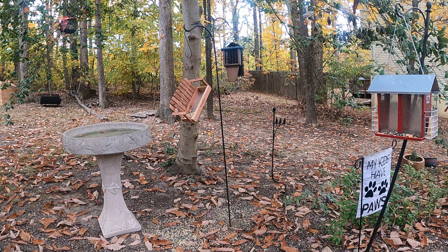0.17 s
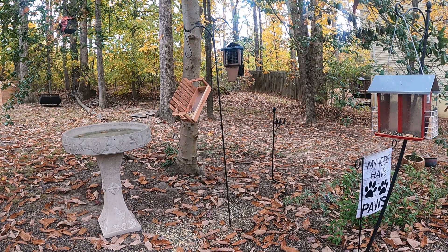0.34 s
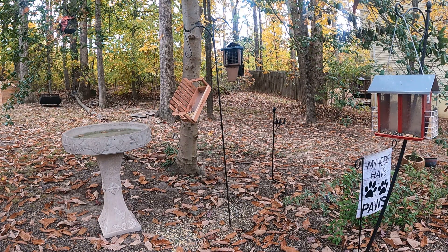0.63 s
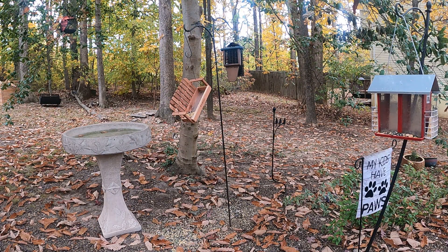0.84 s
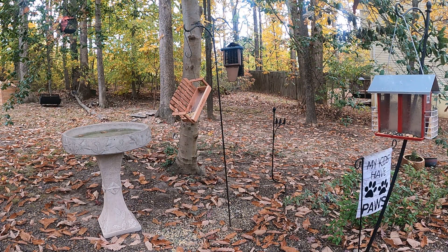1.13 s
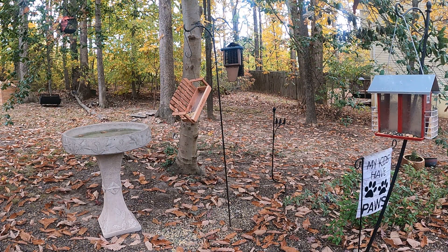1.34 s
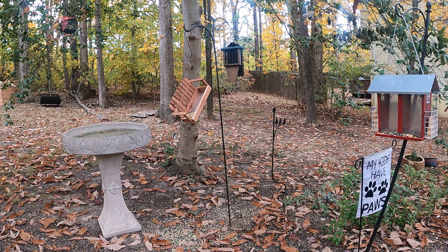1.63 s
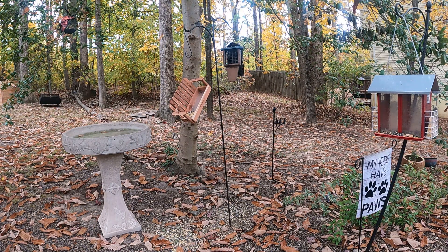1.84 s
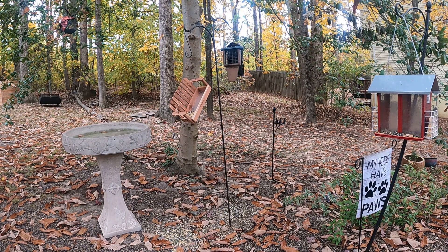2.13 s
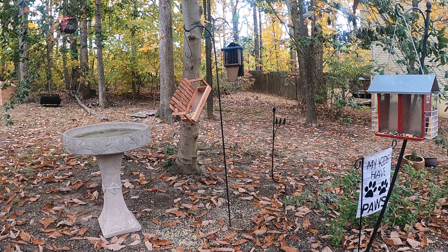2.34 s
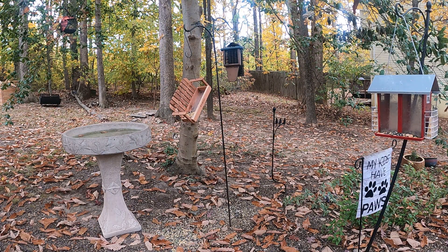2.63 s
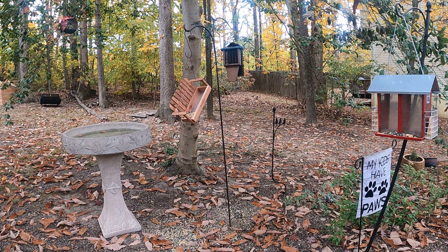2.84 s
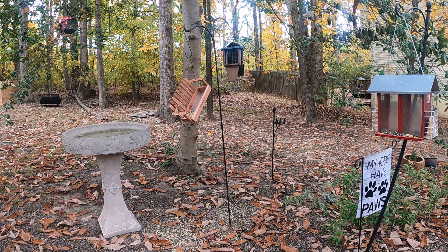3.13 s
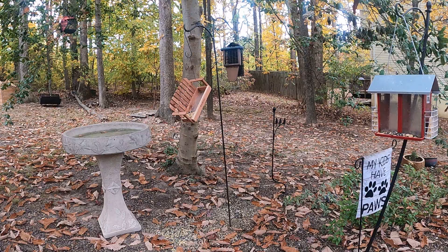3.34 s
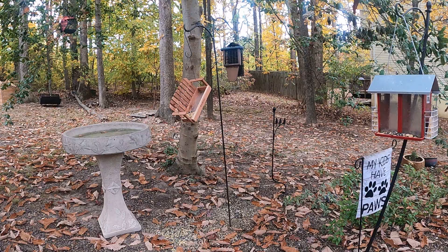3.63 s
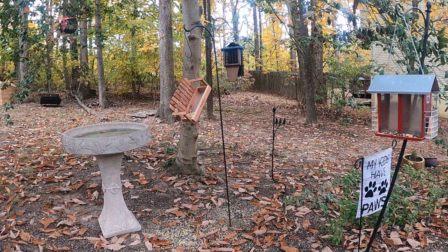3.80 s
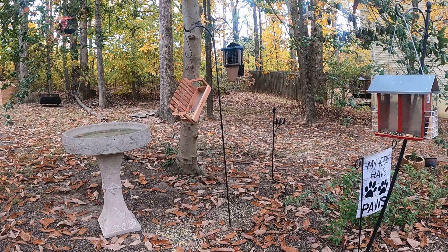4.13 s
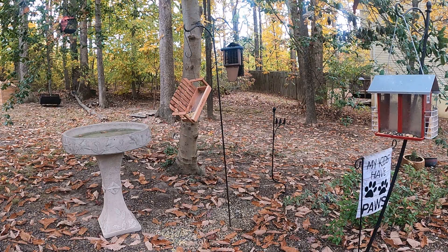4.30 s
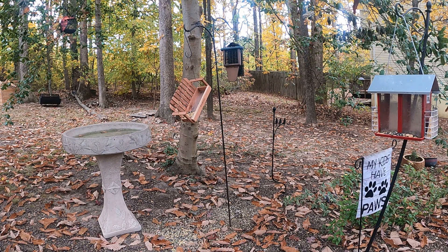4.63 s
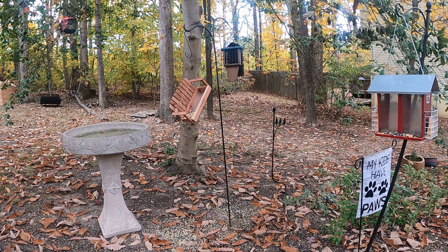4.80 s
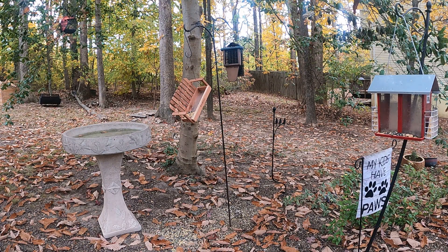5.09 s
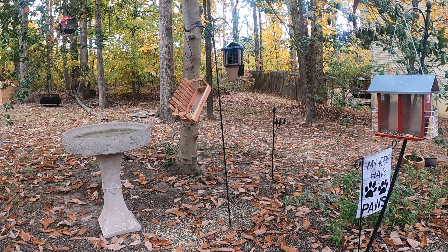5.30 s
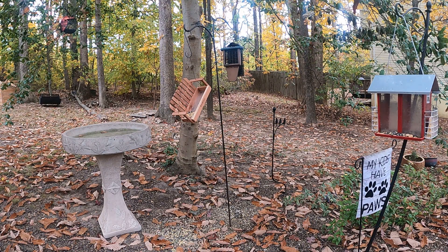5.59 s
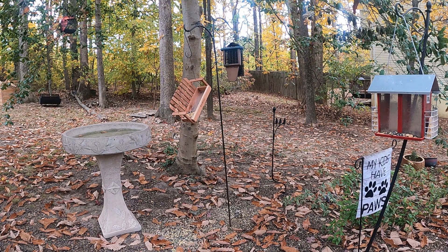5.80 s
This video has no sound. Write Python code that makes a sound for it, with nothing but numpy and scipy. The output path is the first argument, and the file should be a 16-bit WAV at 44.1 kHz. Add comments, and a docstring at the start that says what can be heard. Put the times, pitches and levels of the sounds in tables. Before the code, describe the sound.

A quiet wooded backyard in autumn, about six seconds, heard by a fixed stereo microphone. Distant traffic forms a constant deep, gently heaving rumble with soft tyre wash around it; a low roar is fuller at the start, and the traffic lifts slightly near 3.5 s. Dry leaves rustle very faintly now and then, most noticeably near 1.7 and 3.1 s. A songbird some way off gives a soft phrase at 0.6 s, then clearer ones from 1.5 s, coming quickly between 2.1 and 3.5 s: a buzzy upward flick, a fall, then lower steps. It is loudest around 3.3 s. Two softer calls follow at 4.4 and 4.8 s. Thin, fast, high trills sound far away around 3.9-4.6 s and again from 5.2 s to the end, with faint low notes near 4.5 and 5 s. A nearer small bird gives tiny sharp rising chips at 2.4, 3.9 and 5.2 s. Trees blur the calls into soft tails.

```python
"""Distant traffic rumbles, with tyre wash and a low roar, behind a wooded backyard in autumn where dry leaves rustle.
A songbird some way off repeats a phrase that rises, then steps down; others trill thinly far away, and a small
bird close by gives sharp rising chips. Traffic and leaves are filtered noise shaped by swells; the birds are
quivering near-sines, and trunks scatter every call into a soft tail."""
import sys
import numpy as np
from scipy import signal
from scipy.fft import rfft, irfft, next_fast_len
from scipy.io import wavfile
from scipy.ndimage import uniform_filter1d, map_coordinates

SR = 44100
rng = np.random.default_rng(int(sys.argv[2]) if len(sys.argv) > 2 else 0)


def master_out(mix):
    """Clip the mix to full scale and print it as 16-bit PCM to the path in sys.argv[1]."""
    frames = np.transpose(np.atleast_2d(mix))
    ceiling = np.clip(frames, -1, 1)
    pcm = np.round(ceiling * 32767).astype(np.int16)
    wavfile.write(sys.argv[1], SR, pcm)


N = 262395
TIME = np.arange(N) / SR


def undb(db):
    """Decibels to gain."""
    return 10 ** (np.asarray(db) / 20)


def unit(x):
    """Scale to rms 1."""
    return x / np.sqrt(np.mean(x ** 2))


def colour(x, points):
    """Filter by (f/Hz, gain/dB) points joined on a log-frequency axis."""
    hz, db = np.transpose(points)
    size = next_fast_len(x.shape[-1])
    bins = np.maximum(np.fft.rfftfreq(size, 1 / SR), 1)
    gain = undb(np.interp(np.log(bins), np.log(hz), db))
    return irfft(rfft(x, size) * gain, size)[..., :x.shape[-1]]


def walk(rate):
    """Random wander: straight lines between normal random knots, rate knots per second."""
    knots = rng.standard_normal(int(N / SR * rate) + 4)
    return map_coordinates(knots, [TIME * rate], order=1)


def swells(rows):
    """Gain over time of sounds that each grow and fade in a bell shape."""
    return sum(undb(db) * np.exp(-.5 * ((TIME - s) / half) ** 2) for s, half, db in rows)


def around(pair):
    """Two unrelated signals as sound from all sides: alike in the bass, wider above."""
    # stereo width of the surrounding air: f/Hz, side gain/dB
    width = [(30, -25), (90, -25.5), (180, -16), (350, -12.5), (700, -10), (1400, -7.5), (2600, -3.5),
             (5000, -7.5), (9000, -5.5)]
    side = colour(pair[1], width)
    return np.array([pair[0] + side, pair[0] - side])


def pan(left_db):
    """Gains of the two channels, the left louder than the right by left_db."""
    return undb(np.array([[left_db], [-left_db]]) / 2)


def add(track, start, sound):
    """Mix a sound in at its time."""
    i = int(start * SR)
    track[i:i + len(sound)] += sound[:max(N - i, 0)]


def rumble():
    """Far engines: a deep rumble that heaves, a drone that swells on its own, and a steadier body above both."""
    # tone of the engines before each band is levelled: f/Hz, gain/dB
    engine_tone = [(10, -12), (18, -8), (28, -0.5), (39, -0.5), (52, 4), (72, 3), (100, -0.5), (125, -1),
                   (160, -12), (220, -19.5), (400, -85)]
    # surges of the deep rumble: t/s at the height, half length/s, level/dB before panning
    heaves = [(1.21, 0.079, -42), (1.662, 0.023, -41), (2.57, 0.14, -46.5), (3.7, 0.034, -34.5)]
    # swells of the engine drone: t/s at the height, half length/s, level/dB before panning
    drone_swells = [(0.26, 0.062, -51), (1.162, 0.11, -47), (3.422, 0.064, -49), (3.774, 0.12, -45),
                    (4.44, 0.082, -49.5), (4.993, 0.079, -44.5), (5.425, 0.16, -45)]
    # swells of the upper body: t/s at the height, half length/s, level/dB before panning
    body_swells = [(3.719, 0.12, -57), (5.603, 0.22, -62.5)]
    split_hz, body_hz = 65, 122
    # filter kind, edges, steady level in dB, surges
    layers = (("lowpass", split_hz, -44, heaves),
              ("bandpass", (split_hz, body_hz), -46, drone_swells),
              ("highpass", body_hz, -51.5, body_swells))
    out = 0
    for kind, edges, steady_db, surges in layers:
        sos = signal.butter(4, edges, kind, fs=SR, output="sos")
        band = signal.sosfiltfilt(sos, rng.standard_normal((2, N)), padtype="even")
        band = around(colour(band, engine_tone))
        # even out the noise's own ups and downs, so that the surges shape the level
        power = uniform_filter1d(np.mean(band ** 2, axis=0), size=SR // 6)
        band = band / np.sqrt(power)
        out = out + band * (undb(steady_db) + swells(surges))
    return pan(left_db=0.3) * out


def tyre_wash():
    """A distant road: a broad hump of tyre noise near 1 kHz, and a lower roar that comes and goes."""
    # tone of the tyre wash: f/Hz, relative level/dB per Hz
    wash_tone = [(120, 0.5), (200, -4.5), (320, -8), (500, -3), (750, -0.5), (1000, 1), (1500, -4.5),
                 (2100, -10.5), (3000, -19), (4500, -24.5), (7300, -29.5), (8500, -42.5), (11500, -55),
                 (13000, -66)]
    # tone of the road roar: f/Hz, relative level/dB per Hz
    roar_tone = [(115, -24), (170, 2), (215, 0.5), (290, 0.5), (370, -3.5), (520, -19.5)]
    # the wash rises a little as a car passes: t/s at the height, half length/s, level/dB before panning
    wash_swells = [(3.45, 0.61, -68)]
    # cars passing on the far road: t/s at the height, half length/s, roar level/dB
    passes = [(0, 0.66, -60), (3.3, 0.22, -68)]
    wash_db, roar_db, flicker_db = -47, -61.5, 0.63
    wash = unit(around(colour(rng.standard_normal((2, N)), wash_tone)))
    roar = unit(around(colour(rng.standard_normal((2, N)), roar_tone + [(1500, -69)])))
    wash = wash * (undb(wash_db + flicker_db * walk(9)) + swells(wash_swells))
    roar = roar * (undb(roar_db) + swells(passes))
    return pan(left_db=1.3) * wash + roar


def leaves():
    """Each stir of the leaf litter is a cloud of tiny dry ticks of uneven size."""
    # rustles of dry leaves: t/s at the height, half length/s, level/dB before panning
    rustles = [(0.293, 0.051, -69), (0.504, 0.1, -72), (1.02, 0.2, -71.5), (1.21, .06, -80),
               (1.693, 0.083, -65.5), (1.92, 0.064, -74), (2.18, 0.11, -74), (2.60, 0.058, -73),
               (3.09, 0.063, -67), (4.31, 0.044, -72), (5.68, 0.079, -74)]
    # tone of the ticks: f/Hz, relative level/dB per Hz
    leaf_tone = [(1500, -11), (3000, -5.5), (5000, 6), (7400, 0), (8500, -4.5), (10500, -11),
                 (12300, -15.5), (13500, -36)]
    ticks_per_s = 12000
    ticks = rng.standard_normal((2, N)) * (rng.random(N) < ticks_per_s / SR)
    return pan(left_db=3.0) * swells(rustles) * unit(around(colour(ticks, leaf_tone)))


def slur(length, start_hz, middle_hz, end_hz, edge):
    """Pitch arc and breath pressure of one note; edge is the share spent swelling and fading."""
    u = np.linspace(0, 1, int(length * SR))
    arc = np.polyfit([0, .5, 1], [start_hz, middle_hz, end_hz], 2)
    return u * length, np.polyval(arc, u), signal.windows.tukey(len(u), edge)


def whistles(notes, quiver_hz, blur, edge, flutter_db, rise_tilt_db):
    """The syrinx sings a near-sine along each arc; pitch and loudness quiver quickly and unevenly."""
    onset_share = 0.25  # share of a falling note spent swelling
    out = np.zeros(N)
    quiver_phase = 2 * np.pi * np.cumsum(quiver_hz * (1 + 0.36 * walk(220))) / SR
    wobble = signal.sawtooth(quiver_phase, .5) + blur * walk(700)  # triangle wave plus jitter
    wobble = np.tanh(1.32 * wobble)  # the pitch swings only so far, which keeps the top of a note crisp
    flutter = undb(flutter_db * walk(260))
    for start, length, start_hz, middle_hz, end_hz, db, depth_hz in notes:
        t, hz, push = slur(length, start_hz, middle_hz, end_hz, edge)
        # each note buzzes most in its middle
        buzz = np.sqrt(np.abs(np.sin(np.pi * t / length)))
        hz = hz + depth_hz * buzz * wobble[int(start * SR):][:len(t)]
        # falling notes swell slowly; the loudness of a rising note tilts from its start to its end
        falling = end_hz < start_hz
        if falling:
            push = push * np.minimum(t / (onset_share * length), 1)
        tilt_db = 0 if falling else rise_tilt_db
        size = undb(db + tilt_db * (t / length - .5)) * np.sqrt(2)
        add(out, start, size * push * np.sin(2 * np.pi * np.cumsum(hz) / SR))
    return out * flutter


def woods(x, direct_db, early_db, late_db, early_t60, late_t60):
    """The straight path, quick scatter from near trunks, then a dense tail; t60 is the time in s to fall 60 dB."""
    t = np.arange(SR) / SR
    trunks = unit(undb(-60 * t / early_t60) * (1 - np.exp(-t / 0.0059)))
    deep = unit(undb(-60 * t / late_t60) * (1 - np.exp(-t / 0.026)))
    fade = np.hypot(undb(early_db) * trunks, undb(late_db) * deep) / np.sqrt(SR)
    out = undb(direct_db) * np.array([x, x])
    # the scatter changes as birds and branches move: overlapping pieces each get a fresh echo
    hold = int(0.3 * SR)
    for i in range(0, N, hold):
        piece = x[i:i + 2 * hold]
        piece = piece * np.sin(np.pi * np.arange(len(piece)) / (2 * hold))
        echo = fade * unit(around(rng.standard_normal((2, SR))))
        for channel, heard in zip(out, signal.fftconvolve(piece[None], echo, axes=1)):
            add(channel, i / SR, heard)
    return out


def songbird():
    """Up in the trees, so the echoes are stronger than the straight path."""
    # the notes: a lead-in, a buzzy rise, a fall and low steps, phrase by phrase; then two softer closing calls
    # t/s, length/s, start f/Hz, middle f/Hz, end f/Hz, level/dB before the woods, quiver depth/Hz
    song_notes = [(.558, 0.046, 4590, 4660, 4740, -62.5, 130), (.58, .05, 5170, 5540, 5600, -61, 240),
                  (.616, 0.067, 3990, 3820, 3470, -53, 240), (.745, 0.061, 2803, 2900, 2870, -53.5, 190),
                  (1.516, 0.078, 4550, 4910, 5460, -50.5, 340), (1.586, 0.068, 3890, 3590, 3360, -48, 240),
                  (1.706, 0.067, 2900, 2836, 2740, -51, 160), (2.143, 0.07, 4620, 4950, 5340, -50, 300),
                  (2.214, 0.066, 3830, 3743, 3650, -48.5, 150), (2.33, 0.064, 2990, 2890, 2790, -49.5, 170),
                  (2.42, 0.049, 2760, 2610, 2570, -50, 155), (2.518, 0.062, 4320, 4660, 4820, -50.5, 260),
                  (2.54, 0.051, 4690, 5200, 5590, -44.3, 350), (2.592, 0.06, 4130, 3980, 3900, -49, 140),
                  (2.616, 0.05, 3560, 3465, 3270, -49.5, 200), (2.705, 0.09, 2950, 2870, 2810, -52.3, 161),
                  (2.803, 0.063, 2710, 2596, 2530, -55, 170), (2.892, 0.048, 4550, 4670, 4760, -47.5, 160),
                  (2.916, 0.054, 4640, 5210, 5610, -45.5, 340), (2.976, 0.069, 4020, 3720, 3490, -46, 370),
                  (3.1, 0.055, 2990, 2914, 2840, -48.5, 160), (3.19, 0.052, 2676, 2540, 2480, -55.5, 165),
                  (3.264, 0.046, 4520, 4624, 4730, -43, 161), (3.287, .053, 4660, 5400, 5830, -45, 290),
                  (3.346, 0.066, 4220, 3900, 3670, -43, 360), (3.452, 0.06, 3060, 3006, 2950, -51, 140),
                  (4.36, .044, 4380, 4140, 3900, -59, 280), (4.38, 0.076, 3500, 3310, 3190, -54.5, 260),
                  (4.601, 0.051, 2530, 2784, 2910, -50, 220), (4.815, 0.047, 4580, 4920, 5200, -57, 380),
                  (4.814, 0.064, 3950, 3890, 3860, -55.5, 175),
                  (4.836, 0.045, 3780, 3560, 3400, -56.5, 240), (4.842, 0.096, 3340, 3317, 3280, -54, 140),
                  (5.06, 0.06, 2590, 2820, 2900, -51, 240)]
    song = whistles(song_notes, quiver_hz=135.1, blur=0.5, edge=0.24, flutter_db=2.5, rise_tilt_db=-1.0)
    heard = woods(song, direct_db=-11.0, early_db=-4.5, late_db=-5.0, early_t60=0.3, late_t60=0.99)
    return pan(left_db=0.2) * heard


def far_birds():
    """Thin calls that swell softly as their pitch sweeps fast and unevenly up and down, blurred by the wood."""
    # t/s, length/s, start f/Hz, middle f/Hz, end f/Hz, level/dB before pulsing and woods, sweep scale/Hz
    trills = [(0.677, 0.07, 2270, 2240, 2250, -58, 60), (1.67, 0.081, 7400, 7480, 7500, -71, 80),
              (3.88, 0.76, 5970, 6105, 6290, -65, 875), (4.472, 0.13, 2004, 2066, 2120, -58.5, 90),
              (4.931, 0.13, 1994, 2050, 2070, -58.5, 90), (4.98, 0.36, 5060, 5220, 5270, -71.5, 249),
              (5.29, 0.11, 6040, 6000, 6060, -64, 150), (5.238, 0.42, 5800, 5840, 5820, -65, 720),
              (5.534, 0.6, 6030, 6110, 5920, -61, 843)]
    sweeps_hz = 56
    out, unsteady, shake = np.zeros(N), walk(30), walk(600)
    for start, length, start_hz, middle_hz, end_hz, db, sweep_hz in trills:
        t, hz, push = slur(length, start_hz, middle_hz, end_hz, edge=0.37)
        drift, jitter = (np.roll(w, -int(start * SR))[:len(t)] for w in (unsteady, shake))
        cycle = 2 * np.pi * np.cumsum(sweeps_hz * (1 + .025 * drift)) / SR
        hz = hz + sweep_hz * (0.784 * signal.sawtooth(cycle, .5) + .45 * jitter)
        push = push * (1 + 0.5 * np.cos(cycle))  # each sweep is a little pulse
        add(out, start, undb(db) * np.sqrt(2) * push * np.sin(2 * np.pi * np.cumsum(hz) / SR))
    return woods(out, direct_db=-7.0, early_db=-4.0, late_db=-4.0, early_t60=0.3, late_t60=1.0)


def near_bird():
    """Clean, short chips with quick echoes and a soft tail, a hair left of centre, tilted louder toward the top."""
    # t/s, length/s, start f/Hz, middle f/Hz, end f/Hz, level/dB before the woods, quiver depth/Hz
    chip_notes = [(2.402, 0.0084, 5800, 7180, 7200, -55, 30), (3.870, 0.017, 5940, 7120, 7540, -54.5, 30),
                  (5.220, 0.0245, 6030, 7190, 7270, -53, 30)]
    chips = whistles(chip_notes, quiver_hz=194, blur=.4, edge=0.26, flutter_db=1.0, rise_tilt_db=0.5)
    heard = woods(chips, direct_db=-3.0, early_db=-2, late_db=-5.0, early_t60=0.16, late_t60=0.85)
    return pan(left_db=0.5) * heard


def scene():
    """Birds and leaves over the traffic."""
    return rumble() + tyre_wash() + leaves() + songbird() + far_birds() + near_bird()


def record(dry):
    """The recorder cuts the top, steeply above 13 kHz."""
    return signal.sosfilt(signal.ellip(8, .2, 70, 13000, fs=SR, output="sos"), dry)


dry = scene()
out = record(dry)
master_out(out)
```